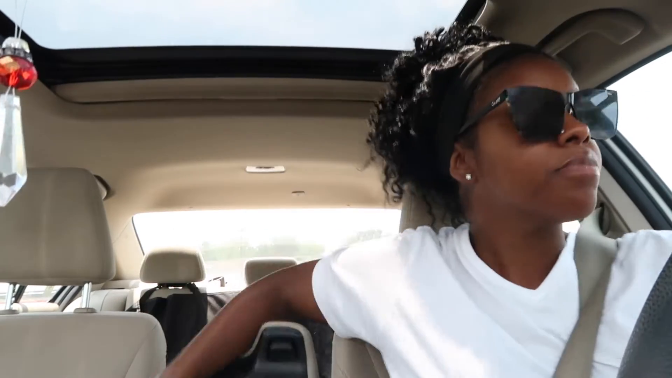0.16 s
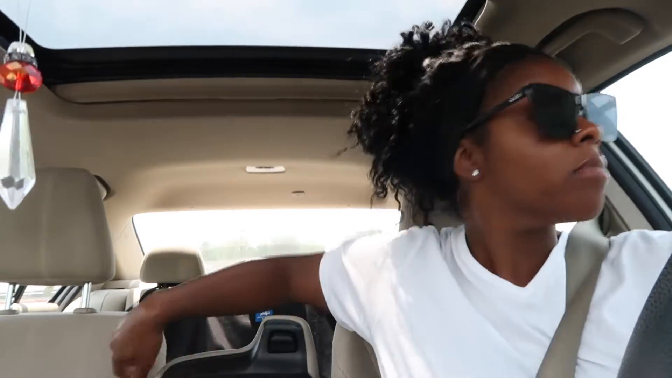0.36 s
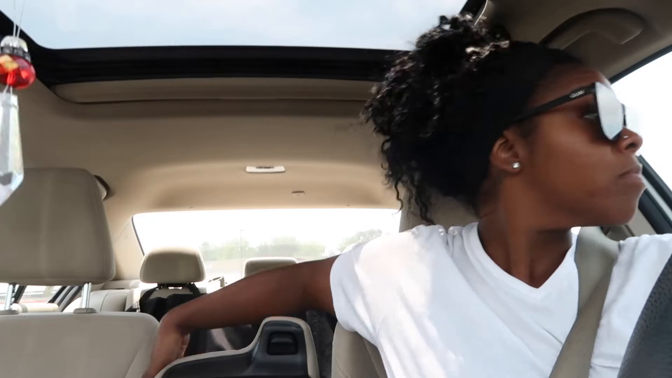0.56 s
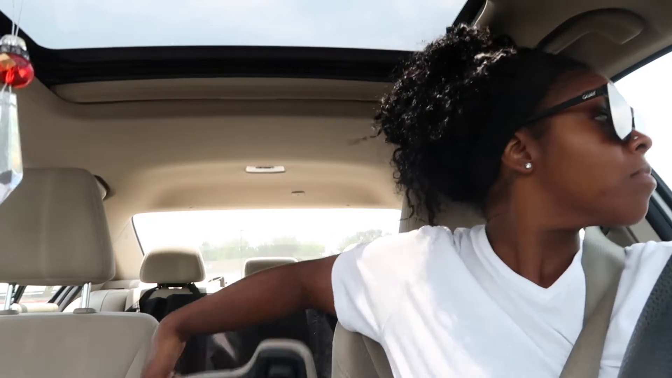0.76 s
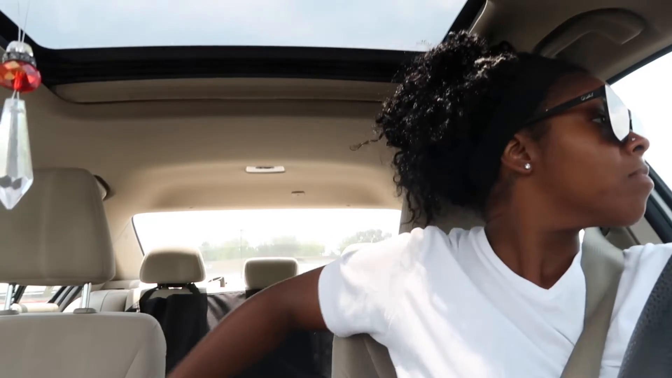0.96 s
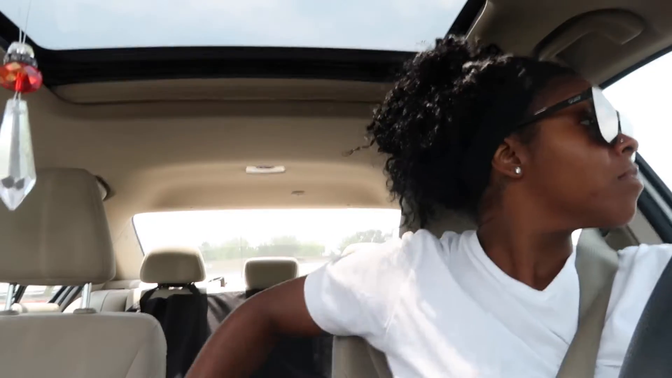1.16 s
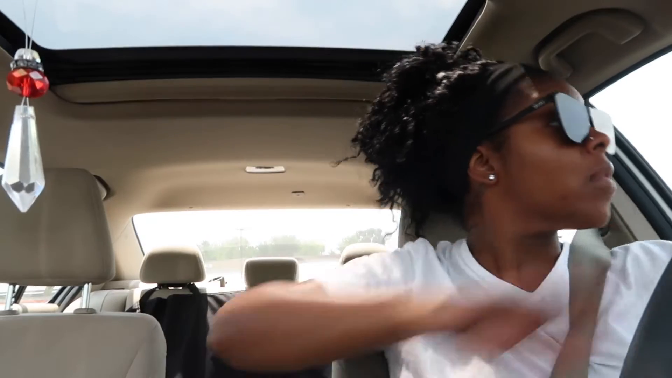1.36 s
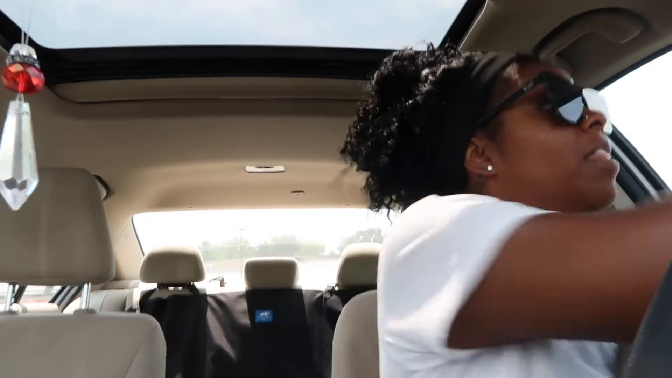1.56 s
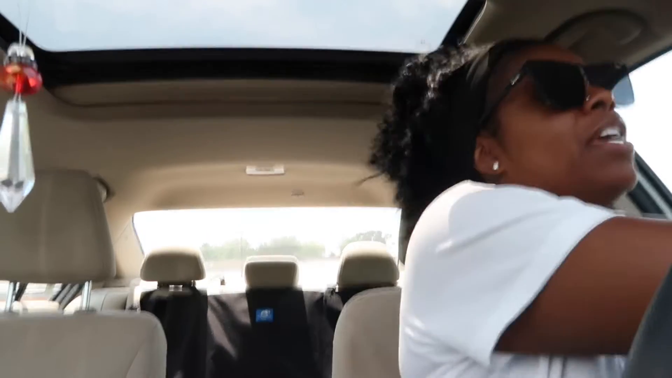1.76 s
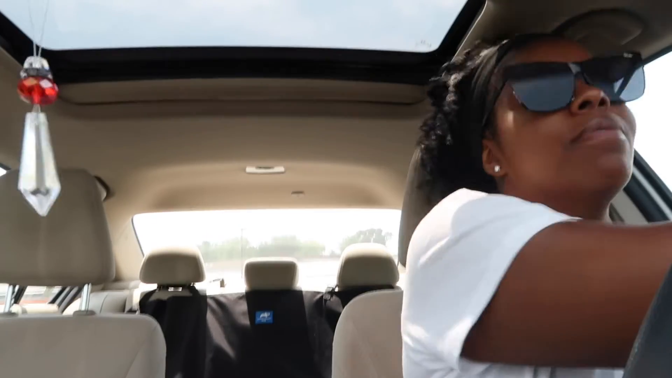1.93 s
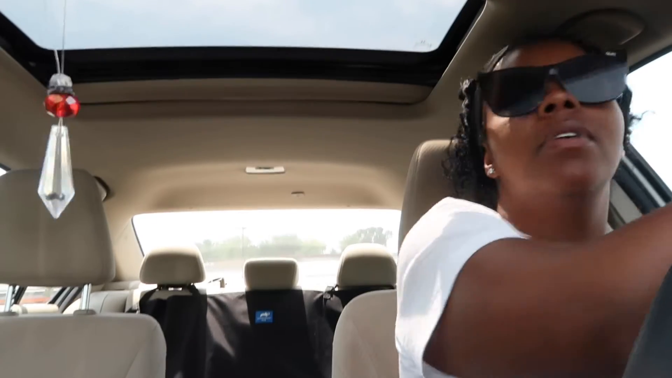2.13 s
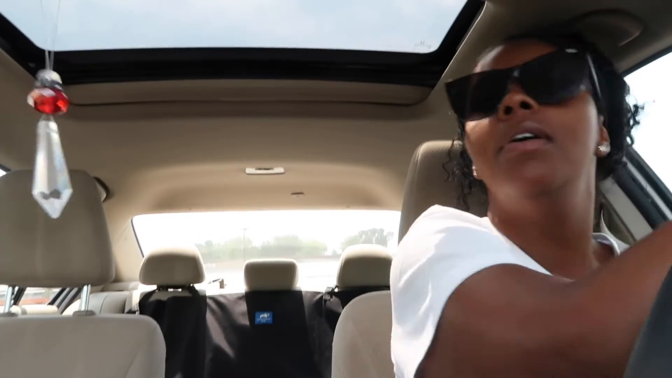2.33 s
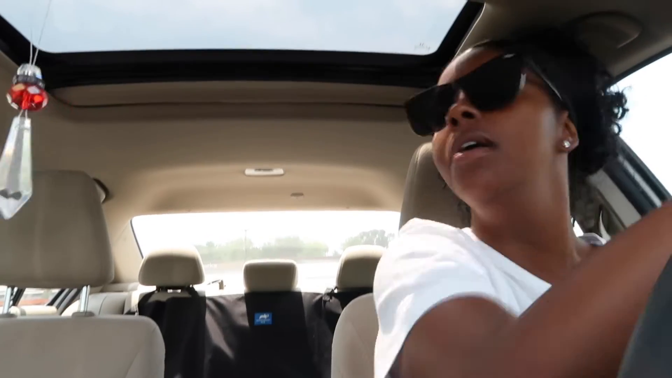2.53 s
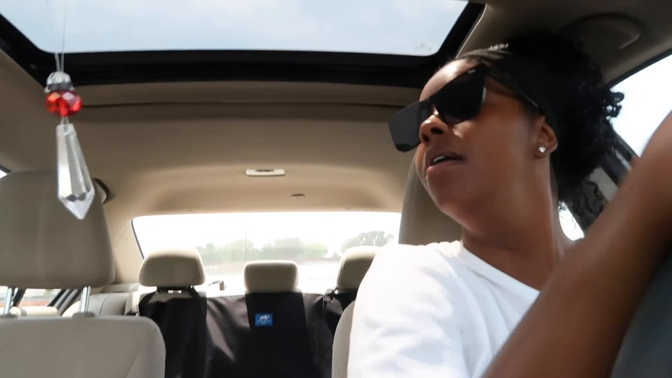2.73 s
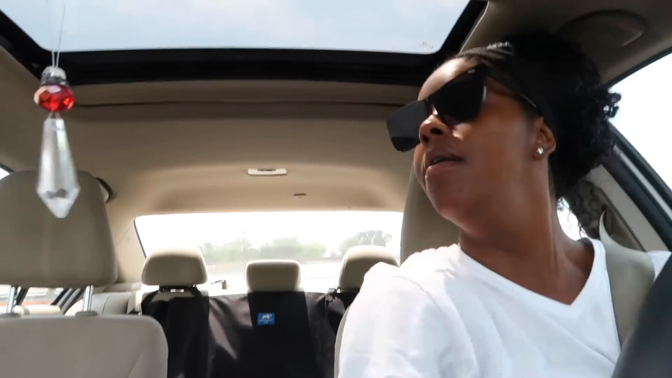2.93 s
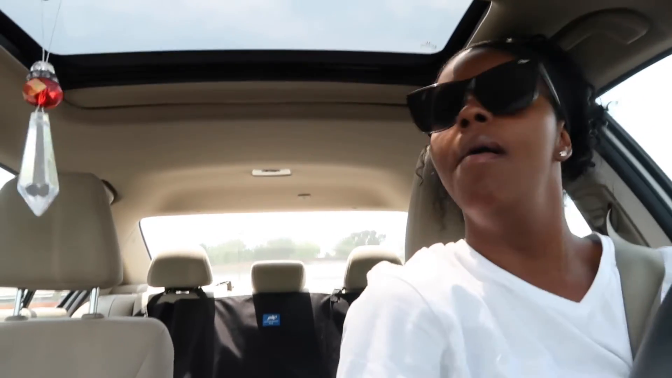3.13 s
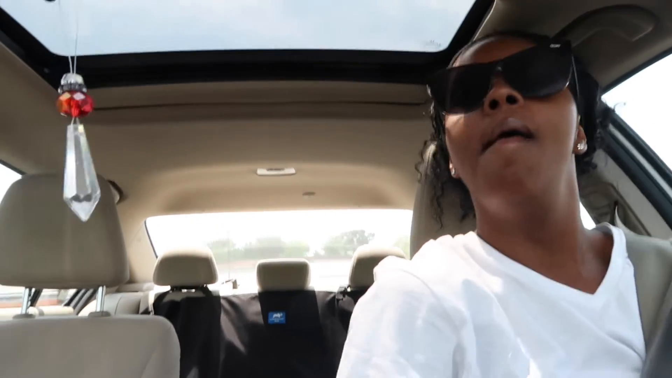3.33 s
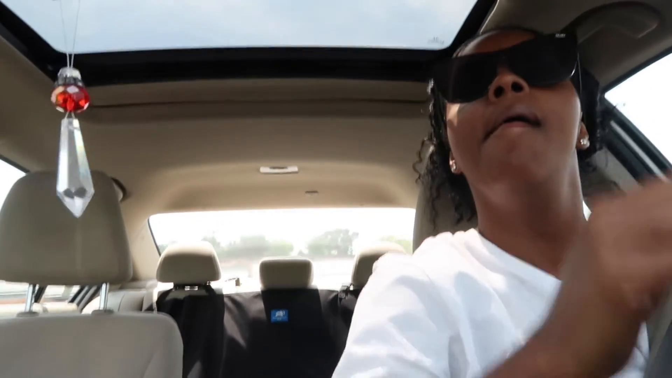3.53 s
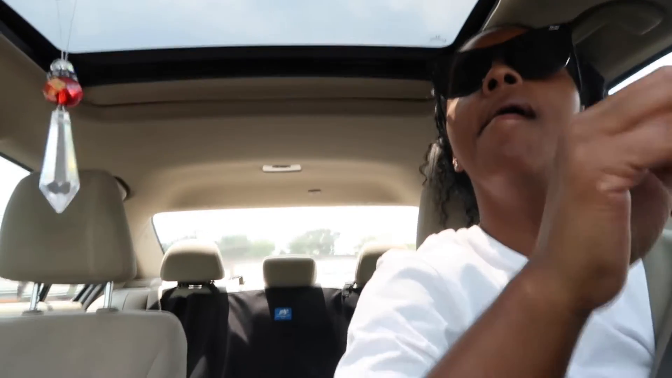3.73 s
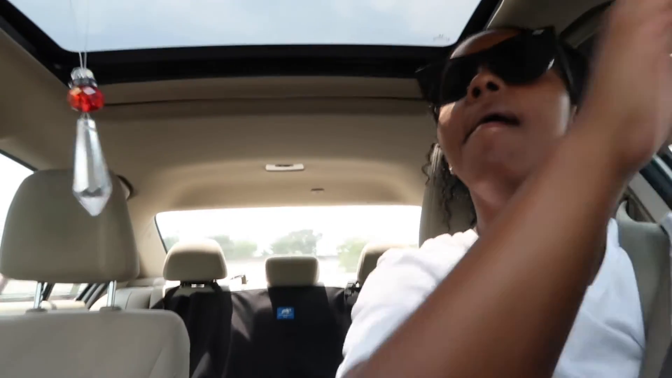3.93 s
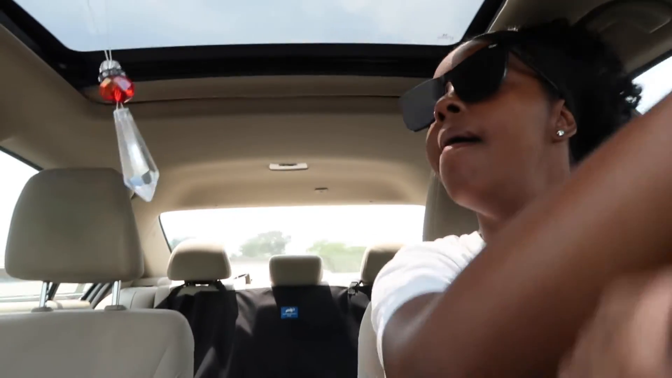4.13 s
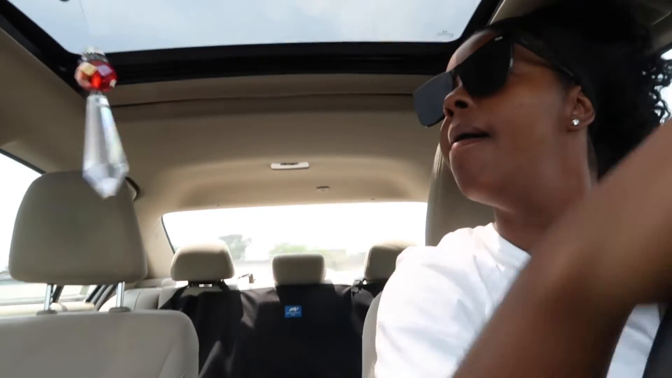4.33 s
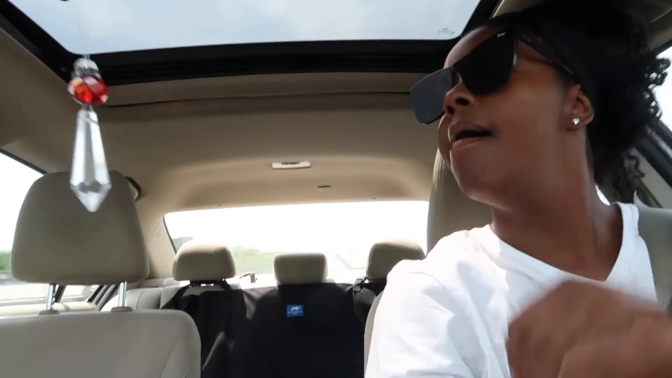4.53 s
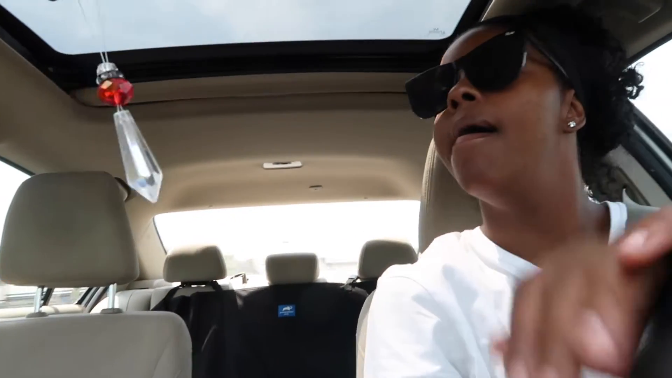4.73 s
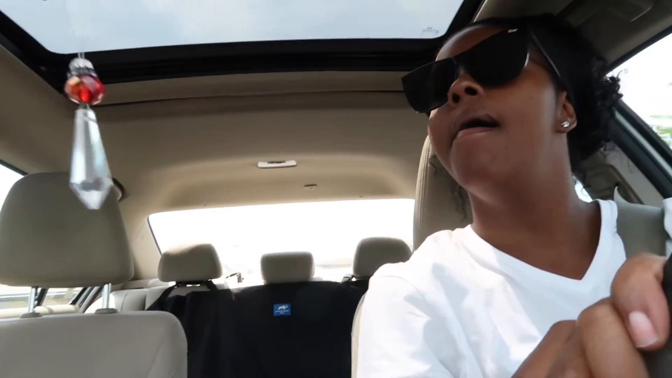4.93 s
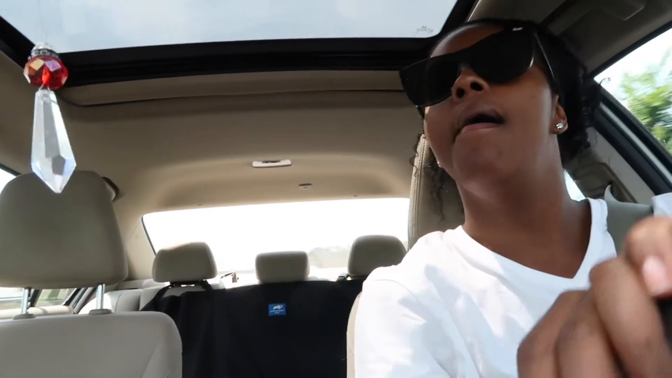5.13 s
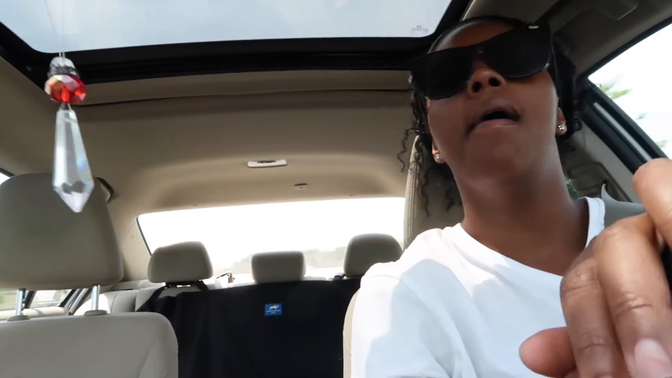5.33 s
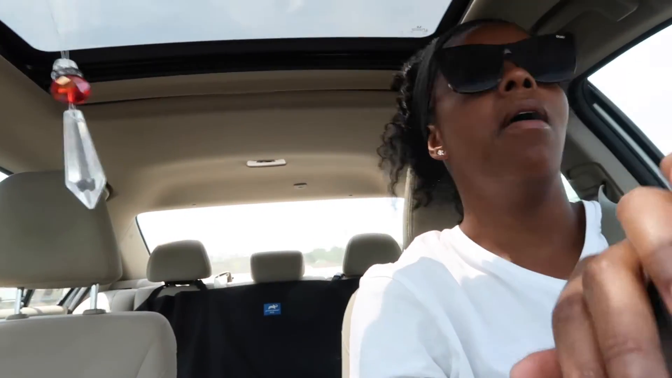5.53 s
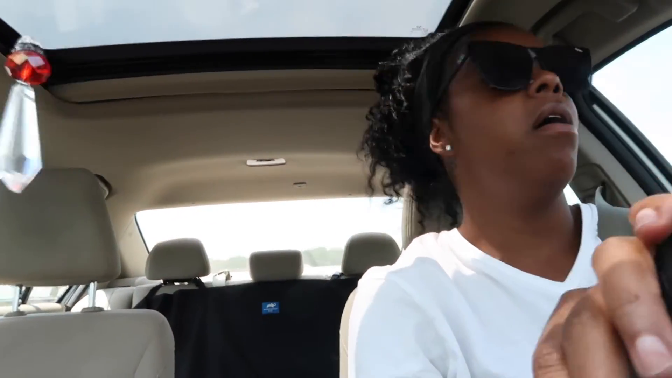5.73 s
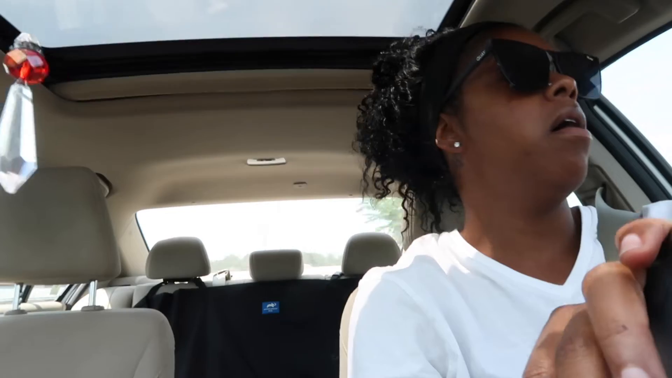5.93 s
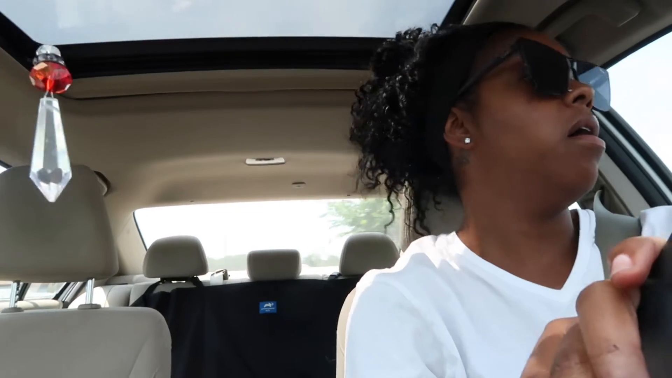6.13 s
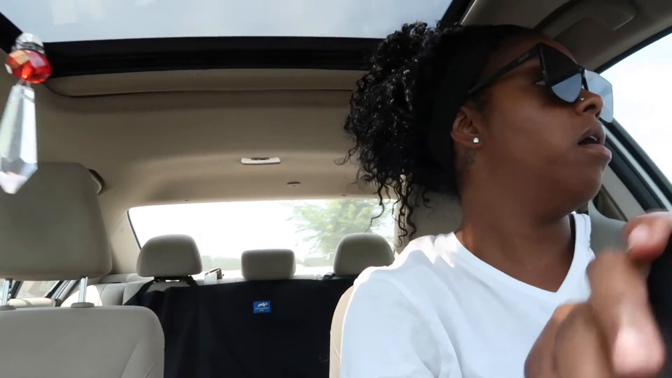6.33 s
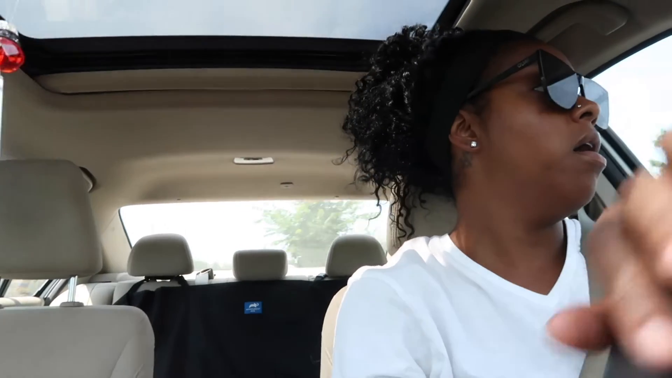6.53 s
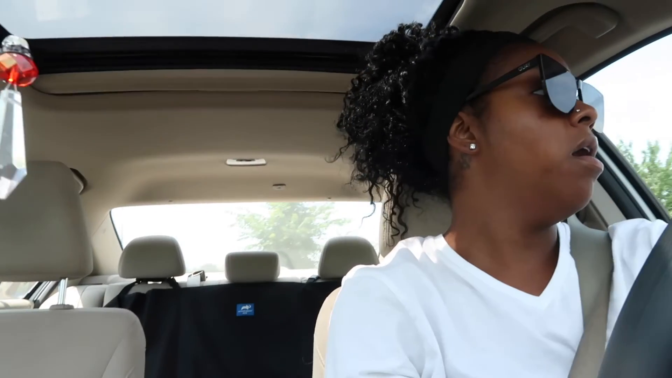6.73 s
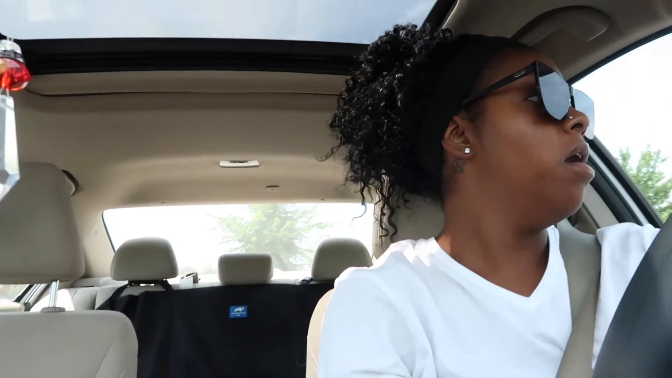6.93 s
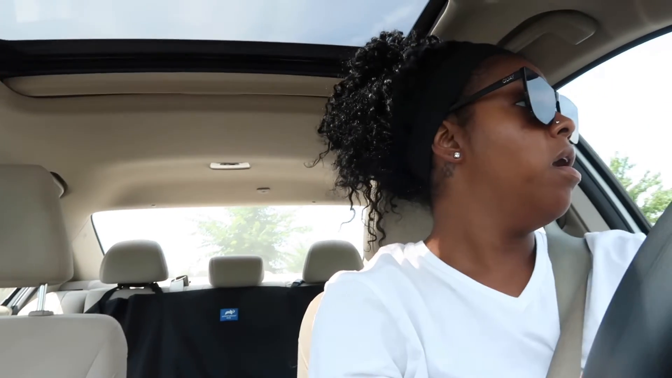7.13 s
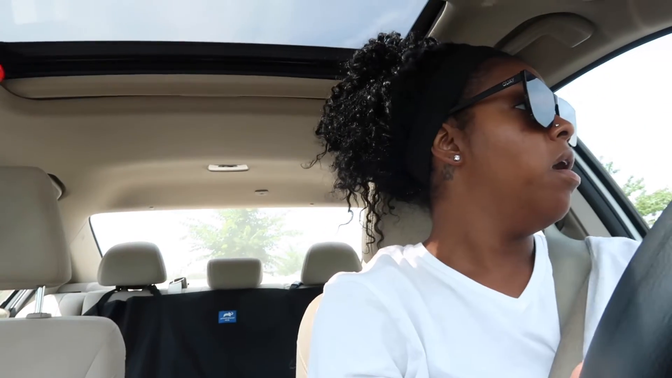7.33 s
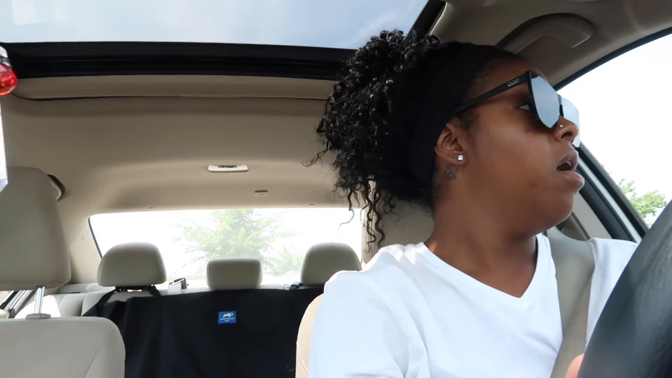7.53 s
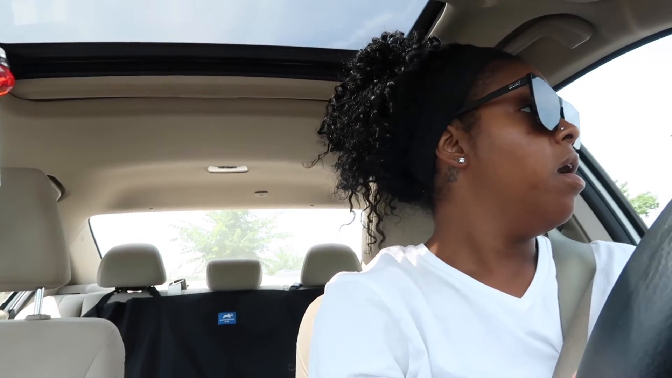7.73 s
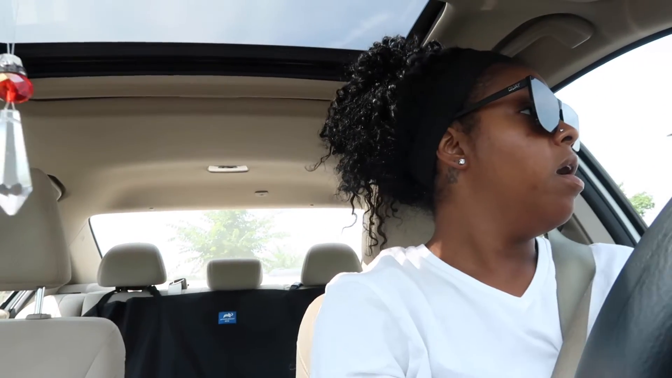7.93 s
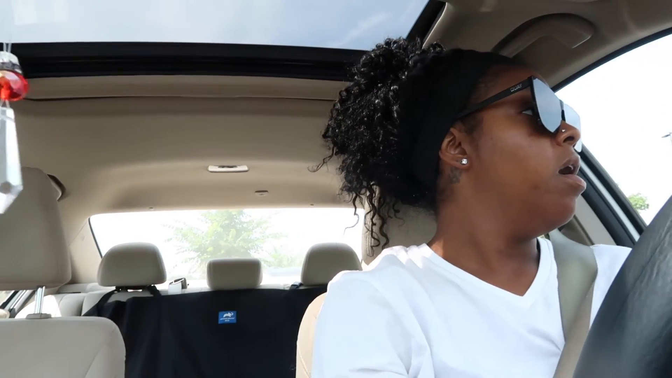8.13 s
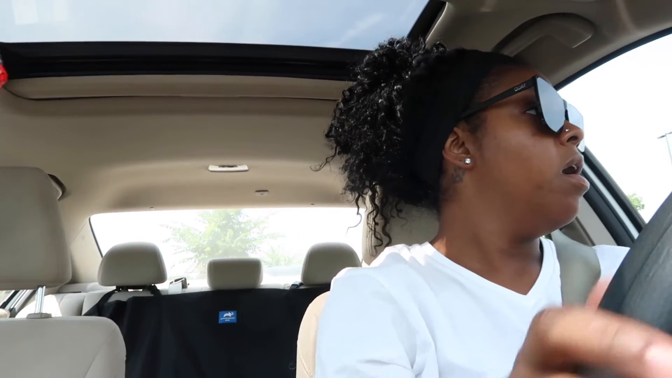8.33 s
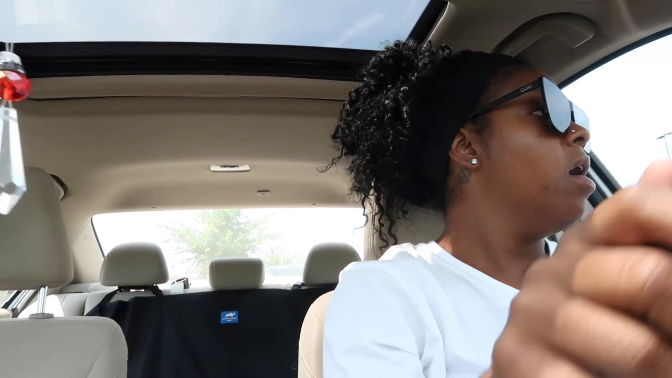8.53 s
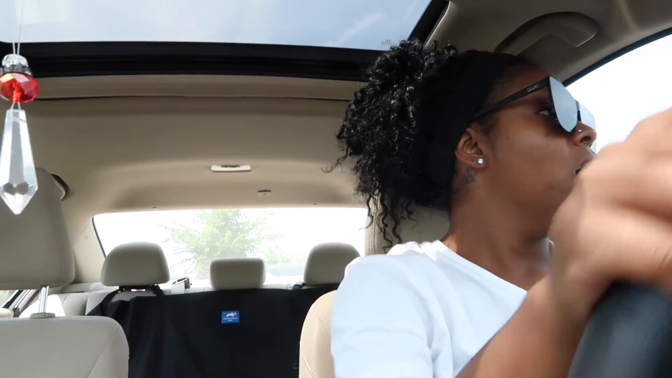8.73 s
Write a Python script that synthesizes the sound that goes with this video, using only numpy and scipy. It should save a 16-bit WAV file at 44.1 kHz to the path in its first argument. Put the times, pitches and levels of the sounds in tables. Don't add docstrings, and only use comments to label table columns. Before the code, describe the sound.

Close inside a small, dry car cabin, a low engine idle and fan hiss sit under a steady indicator tick. Small plastic rattles lead to one loud lid slam, after which the background dips and slowly returns. The engine rises, trim knocks and hands rub the wheel through a turn. A cluster of thumps ends the ticking, and the car slows to a soft idle.

```python
import sys
import numpy as np
from scipy import signal
from scipy.fft import rfft, irfft, next_fast_len
from scipy.io import wavfile

SR = 44100
rng = np.random.default_rng(int(sys.argv[2]) if len(sys.argv) > 2 else 0)


def store_wav(level_fs):
    pcm = np.round(np.clip(np.atleast_2d(level_fs), -1, 1) * 32767)
    wavfile.write(sys.argv[1], SR, pcm.T.astype(np.int16))


def amplitude_ratio(level_db):
    exponent = np.asarray(level_db, float) / 20
    return 10 ** exponent


N = 386757


def in_time(rows):
    s, *columns = np.transpose(rows)
    return [np.interp(np.arange(N) / SR, s, c) for c in columns]


def at_hz(points, hz):
    table_hz, values = np.transpose(points)
    return np.interp(np.log(hz), np.log(np.maximum(table_hz, 1)), values)


def rms_one(x):
    return x / np.sqrt(np.mean(x ** 2) + 1e-20)


def drift(rate):
    r = np.exp(-80 * np.pi * rate / SR)
    slow = signal.lfilter([1], [1, -2 * r, r * r], rng.standard_normal(N // 40 + 2002))[2000:]
    return np.interp(np.arange(N) / 40, np.arange(len(slow)), rms_one(slow))


def resonance(x, hz, width_hz):
    r = np.exp(-np.pi * width_hz / SR)
    poles = [1, -2 * r * np.cos(2 * np.pi * hz / SR), r * r]
    return signal.lfilter([(1 - r * r) / 2, 0, (r * r - 1) / 2], poles, x)


def glide(hz, level_db, flutter_db, rate):
    level = np.sqrt(2) * amplitude_ratio(level_db + flutter_db * drift(rate))
    return level * np.sin(2 * np.pi * np.cumsum(hz) / SR)


def add(out, x, s):
    i = round(s * SR)
    out[..., i:i + x.shape[-1]] += x[..., :N - i]


# frequency in Hz, phase in radians.
PORT_PHASE = [(0, 0), (2500, .45), (6000, 1.25), (7500, 1.9), (8400, 2.3), (9000, 2.85), (9700, 2.35),
              (10400, 2.1), (12000, 2.4), (14000, 2.3), (22050, 2.5)]


def ports(x):
    size = next_fast_len(N, True)
    hz = np.arange(size // 2 + 1) * SR / size
    turn = np.exp(-.5j * np.interp(hz, *np.transpose(PORT_PHASE)))
    return irfft(rfft(x, size) * [turn, 1 / turn], size)[:, :N]


# frequency in Hz, left-right likeness from -1 to 1.
LIKENESS = [(60, .9998), (130, .998), (290, .93), (640, .9), (1410, .4), (3100, .35), (6800, .05),
            (10000, -.4), (11300, -.8), (12300, -.95), (15000, -.997)]


def banded_noise(spectrum, patchy_db):
    out, together, white = 0, drift(4.0), rng.standard_normal((2, 2, N + 8000))
    lowest, highest = spectrum[0][0], spectrum[-1][0]
    count = round(2.5 * np.log2(highest / lowest))
    edges = np.geomspace(lowest, highest, count + 1)
    for k, (low, high) in enumerate(zip(edges, edges[1:])):
        band = signal.butter(2, [low, high], "band", fs=SR, output="sos")
        mid, side = signal.sosfilt(band, white[k % 2])[:, 8000:]
        hz = np.sqrt(low * high)
        alike = np.clip(at_hz(LIKENESS, hz), -.998, 1)
        gain = amplitude_ratio(at_hz(spectrum, hz) + patchy_db * (1.4 * together + drift(8.0)))
        out = out + gain * (np.sqrt(1 + alike) * mid + np.sqrt(1 - alike) * side * [[1], [-1]])
    return out / np.sqrt(np.mean(out.mean(0) ** 2))


DUCK_S, DUCK_DB, DUCK_ATTACK_S, DUCK_HOLD_S, RECOVER_DB_PER_S = 1.17, 17, 0.12, 0.043, 8.5


def gain_control():
    corners = DUCK_S + np.cumsum([0, DUCK_ATTACK_S, DUCK_HOLD_S, DUCK_DB / RECOVER_DB_PER_S])
    return np.interp(np.arange(N) / SR, corners, [0, -DUCK_DB, -DUCK_DB, 0])


# time in seconds, firing rate in Hz, engine load in dB, road shake in dB.
DRIVE = [(0.0, 24.45, -2, -28.5), (1.0, 23.88, 6.5, -37), (1.51, 24.13, 7.5, -23.5),
         (2.1, 45.28, 12, -33.5), (2.3, 42.11, 8.5, -20), (2.65, 36.38, 12, -30.5),
         (3.05, 32.57, 13, -30.5), (3.3, 32.44, 11, -24.5), (3.85, 35.19, 8.5, -24),
         (4.27, 37.34, 14.5, -21.5), (4.64, 43.66, 12, -21.5), (5.2, 37.87, 12.5, -13.5),
         (5.49, 37.47, -1, -21), (5.74, 34.72, 16.5, -34), (6.01, 31.1, 2.5, -19.5),
         (6.5, 25.49, 11.5, -29.5), (7.2, 23.88, -1.5, -24), (8.77, 25.45, 2, -40.5)]


def drive():
    return in_time(DRIVE)


# time in seconds, level in dB.
FAN = [
    (0, 2.5),
    (2.5, 3.5),
    (6.5, 0),
    (8.77, -2),
]


def fan():
    return in_time(FAN)[0]


# time in seconds, level in dB.
RUSH = [(5.15, -68.5), (5.25, -57), (6.25, -57), (6.45, -66), (6.98, -57.5), (8.2, -71.5), (8.77, -70)]


def rush():
    return in_time(RUSH)[0]


# centre in seconds, length in seconds, cloth level in dB.
SHIFTS = [
    (0.38, 3.8, -87.5),
    (2.237, 0.5, -70.5),
    (3.007, 1, -63),
    (4.185, 0.96, -58),
    (5.766, 0.41, -61),
]


def shifting():
    out = np.zeros(N)
    for s, length, db in SHIFTS:
        out += amplitude_ratio(db) * np.clip(1 - 2 * np.abs(np.arange(N) / SR - s) / length, 0, 1) ** 2.3
    return out


# frequency in Hz, level in dB per Hz.
HISS = [(470, -8), (800, -7), (1080, -15.5), (1330, -7), (2560, -13), (3160, -20), (4000, -12), (5200, -29),
        (8800, -120)]
RUSTLE = [(1290, -28.5), (2200, -0.5), (3180, -7), (3870, -5.5), (4330, -7), (6360, -5), (8000, -9.5),
          (10600, -8.5), (13300, -14), (13700, -42.5), (15300, -60)]
VENT_DB, CLOTH_DB, PREAMP_DB, SEAT_RE_CLOTH_DB = -58, -71.5, -70.5, 10.5
SUM_CUT_HZ = 12900


def moving_air(rush_db):
    cloth = shifting()
    preamp = amplitude_ratio(PREAMP_DB - gain_control())
    hiss = amplitude_ratio(VENT_DB) + amplitude_ratio(SEAT_RE_CLOTH_DB) * cloth + preamp
    rustle = amplitude_ratio(CLOTH_DB) + cloth + amplitude_ratio(rush_db)
    air = hiss * banded_noise(HISS, patchy_db=-1.0) + rustle * banded_noise(RUSTLE, patchy_db=1.5)
    alike = air.mean(0)
    low_pass = signal.butter(12, SUM_CUT_HZ, fs=SR, output="sos")
    return air - alike + signal.sosfiltfilt(low_pass, alike)


# frequency in Hz, width in Hz, level in dB re the rush.
SEAL_WHISTLES = [(4870, 250, -9.5), (6470, 800, -5), (3800, 280, -13)]


def seals(rush_db):
    white = rng.standard_normal((len(SEAL_WHISTLES), N))
    bands = np.zeros(N)
    for x, (hz, width, db) in zip(white, SEAL_WHISTLES):
        breath = resonance(resonance(x, hz, width), hz, width)
        bands += amplitude_ratio(db + 2.0 * drift(3.0)) * rms_one(breath)
    return amplitude_ratio(rush_db) * bands


# frequency in Hz, level in dB per Hz.
BOOM = [(12, -39), (20, -15), (43, 5), (80, 9.5), (95, 3), (124, -14), (160, -29), (210, -43.5),
        (350, -120)]
DRONE = [(65, -41), (110, -1.5), (152, -13), (215, -12), (300, -17.5), (346, -10), (384, -19.5), (518, -20),
         (1300, -41), (1690, -83.5), (2860, -120)]
DRONE_DB, DRONE_PER_ROAD, DRONE_DB_PER_OCTAVE, DRONE_PER_FAN = -36, 0.019, 3, 0.67


def ride(hz, road_db, fan_db):
    drone_db = DRONE_DB + DRONE_PER_ROAD * (road_db + 35.5) + DRONE_DB_PER_OCTAVE * np.log2(hz / 25)
    boom = amplitude_ratio(road_db) * banded_noise(BOOM, patchy_db=3.0)
    return boom + amplitude_ratio(drone_db + DRONE_PER_FAN * fan_db) * banded_noise(DRONE, patchy_db=.9)


# tone in Hz, level in dB, share of the fan's easing, fading in dB per s.
BLOWER = [(177.5, -42.5, 2.4, .3), (247.6, -55, 3.6, 0), (350, -49.5, 3.1, 3), (13040, -86, .8, 0)]


def blower(fan_db):
    out, t = np.zeros(N), np.arange(N) / SR
    for hz, db, share, fading in BLOWER:
        level = amplitude_ratio(db + share * fan_db - fading * t + 2 * drift(2.1))
        out += level * np.sin(2 * np.pi * hz * t + 0.98 * drift(2.4))
    return out


# time in seconds, pitch in Hz, level in dB.
PUMP = [(2.45, 242.7, -70.5), (2.6, 222.7, -43.5), (2.9, 204.3, -40), (3.2, 200, -46), (3.5, 204, -46),
        (3.9, 228.4, -48), (4.2, 225, -42), (4.4, 227.8, -57), (4.6, 223, -100)]


def pump():
    return glide(*in_time(PUMP), flutter_db=2.0, rate=1.8)


# level in dB at idle, share of the load that it follows.
FIRING = [(-35, 0.72), (-40, 1.32), (-41.5, 1.01), (-44, 0.71), (-34, -.25)]
# frequency in Hz, gain in dB.
MOUNTS = [(22, -0.5), (33, -4.5), (42, 1), (70, -2.5), (100, 3), (113, -7), (132, -4.5), (165, -10.5),
          (230, -22)]
# time in seconds, phase in radians.
COARSE_ROAD = [(3.9, 0), (4.5, 1.2), (6.2, 1.2), (6.6, .5)]


def engine(hz, load_db, road_db):
    out, turn = np.zeros(N), 2 * np.pi * np.cumsum(hz) / SR
    shake = .25 + .3 * np.maximum(road_db + 27, 0) + in_time(COARSE_ROAD)[0]
    for k, (db, share) in enumerate(FIRING, 1):
        level_db = db + share * load_db + at_hz(MOUNTS, k * hz) + 2.8 * drift(1.3)
        out += np.sqrt(2) * amplitude_ratio(level_db) * np.sin(k * turn + k * k + shake * drift(2.67))
    return out


# time in seconds, pitch in Hz, level in dB.
SQUEAK = [(1.7, 1950, -120), (1.74, 2150, -60), (1.79, 2750, -60), (1.83, 2850, -120)]


def squeak():
    return glide(*in_time(SQUEAK), flutter_db=5.0, rate=60.0)


# start in seconds, length in seconds, level in dB, slips per second.
SLIPS = [(0, 0.14, -56, 970), (0.175, 0.061, -33.5, 360), (0.595, 0.17, -44.5, 670),
         (2.095, 0.088, -39.5, 270), (2.205, 0.11, -40, 430), (2.405, 0.1, -40, 380),
         (4.048, 0.14, -44, 680), (4.193, 0.1, -37.5, 1000), (1.118, 0.095, -42.5, 810),
         (5.73, 0.04, -31, 180), (5.767, 0.084, -39.5, 1500), (8.323, 0.044, -49.5, 120),
         (8.405, 0.11, -42.5, 150), (8.724, 0.083, -46.5, 190)]
# frequency in Hz, width in Hz, level in dB.
RIM = [(1400, 200, -8), (2550, 430, -8.5), (3550, 520, -9), (4760, 110, -5.5), (6270, 660, -11),
       (10700, 5400, -20.5)]


def palm():
    force = np.full(N, 1e-18)
    for s, length, level_db, per_s in SLIPS:
        draw = rng.standard_normal((2, 8000))[:, :round(length * SR)]
        phase = np.cumsum(per_s / SR * (1 + 3.0 * draw[0]))
        slip = np.diff(np.floor(phase), prepend=0) > 0
        friction = rms_one(slip * amplitude_ratio(draw[1]) + 0.13 * draw[1])
        add(force, amplitude_ratio(level_db) * np.hanning(len(slip)) ** 0.35 * friction, s)
    modes = [amplitude_ratio(db) * resonance(force, hz, width) * (-1) ** k for k, (hz, width, db) in enumerate(RIM)]
    return 4.3 * sum(modes)


# time in seconds, peak in dB, centre in Hz.
BUMPS = [(0.213, -13, 294), (0.682, -21.5, 343), (1.109, -1.5, 447), (1.113, -4, 262), (1.122, -10.5, 393),
         (1.133, -24.5, 379), (1.317, -10, 246), (3.338, -32, 227.5), (4.771, -9, 266.1),
         (5.7225, -2.5, 527), (5.738, -7.5, 234), (5.756, -21, 233), (5.776, -5.5, 407), (5.793, -14, 415),
         (5.811, -6, 436), (5.828, -10.5, 415), (5.849, -21, 230), (8.758, -11, 523), (8.764, -6, 233)]
# time in seconds, peak in dB, centre in Hz.
LID_BOOMS = [
    (1.108, -11, 75.4),
    (1.111, -25.5, 92),
    (1.118, -29, 150),
]
# time in seconds, peak in dB, centre in Hz.
BOOMS = [(5.724, -11, 106), (5.776, -14, 118.1), (5.735, -5.5, 190), (5.741, -14, 545), (5.8, -27, 810),
         (8.7575, -6, 471), (8.759, -7, 180)]
BUMP_KIND, LID_KIND, BOOM_KIND = (-0.25, 0.11), (1.4, 0.01), (-27, 0.013)


def bumps():
    out, t = np.zeros(N), np.arange(12000) / SR
    groups = (BUMPS, BUMP_KIND), (LID_BOOMS, LID_KIND), (BOOMS, BOOM_KIND)
    for s, peak_db, hz, air_db, t60 in [(*row, *kind) for rows, kind in groups for row in rows]:
        t60 = t60 * (300 / hz) ** 0.15
        push = rng.standard_normal(12000) * amplitude_ratio(-60 * t / max(t60, .02)) * np.minimum(t / 0.0044, 1)
        thud = resonance(resonance(resonance(push, hz, .5 * hz), hz, 0.75 * hz), hz, 0.75 * hz)
        air = resonance(resonance(push, 64, 110), 76, 130)
        hit = thud / np.abs(thud).max() + amplitude_ratio(air_db) * air / np.abs(air).max()
        add(out, amplitude_ratio(peak_db - 7.0) * hit, s - .002)
    return out


# time in seconds, peak in dB, pitch in Hz, t60 in seconds.
SLAMS = [
    (1.121, -8.5, 110, 0.045),
    (5.7329, -6.5, 98, .05),
    (5.7743, -8.5, 109, 0.06),
]
SLAM_PUSH_S = 0.0037


def slams():
    out, t = np.zeros(N), np.arange(8000) / SR
    for s, peak_db, hz, t60 in SLAMS:
        push = np.sin(np.pi * np.minimum(t / SLAM_PUSH_S, 1)) + 1e-18
        swing = resonance(push, hz, 4.6 / max(t60, .02))
        add(out, amplitude_ratio(peak_db) * swing / np.abs(swing).max(), s)
    return out


# time in
# seconds, peak in dB, pitch in Hz, t60 in seconds.
RINGS = [(1.107, -7.5, 1028, 0.024), (1.109, -15, 1223, 0.032), (1.113, -16, 2395, 0.035),
         (1.117, -1.5, 2272, 0.022), (1.112, -8, 3106, .025), (1.17, -48, 1214, 1.2),
         (1.463, -30, 1577, 0.052), (1.461, -21, 2060, 0.022), (1.478, -39, 4920, 0.032),
         (1.846, -38, 2230, 0.025), (1.85, -40.5, 3330, 0.033), (1.856, -29, 4700, 0.013),
         (1.858, -34.5, 2960, 0.035), (1.877, -35, 2510, 0.052), (1.462, -13.5, 6200, 0.033),
         (3.975, -18, 2202, 0.039), (3.976, -19, 2694, .05), (3.975, -26.5, 4650, 0.046),
         (4.146, -18, 2700, 0.032), (4.202, -17, 2180, 0.0091), (4.514, -31, 2690, 0.06),
         (4.515, -24.5, 3250, 0.053), (4.523, -25, 2000, 0.025), (5.724, -27, 4800, 0.055),
         (5.7267, -18, 1750, 0.02), (5.721, -19.5, 1120, 0.046), (5.737, -20, 1059, 0.07),
         (5.736, -10, 1750, 0.018), (5.767, -19, 1570, 0.027), (5.773, -16, 1650, 0.015),
         (5.791, -29, 1400, 0.03), (5.794, -18.5, 595, 0.1), (5.813, -24.5, 1095, 0.031),
         (5.816, -40, 634, 0.092), (5.837, -31.5, 1014, 0.07), (5.85, -29, 595, 0.057),
         (8.756, -33.5, 2510, 0.061), (3.978, -33, 990, 0.029), (3.012, -40.5, 4230, 0.043),
         (5.04, -41.5, 3510, 0.037), (8.42, -52, 3500, .1), (8.44, -48, 4670, 0.091),
         (1.109, -16, 4220, .03)]
DRY_RINGS = [(0.068, -39, 2260, 0.033), (0.188, -37, 3900, .02), (0.208, -30, 3800, .03),
             (0.848, -38, 3500, .02), (1.109, -22, 1750, .03), (1.112, -16, 3050, .025),
             (1.113, -12.5, 6180, 0.023), (2.858, -25, 5800, .02), (3.012, -35, 2970, .025),
             (3.333, -26, 1696, .03), (3.335, -28.5, 650, 0.037), (3.975, -28, 583, .03),
             (4.202, -22.5, 740, 0.028), (4.445, -32, 2360, .02), (5.732, -27, 3400, .03),
             (5.784, -32, 2600, .03)]
RING_CHATTER_S = 0.0034


def rings(rows):
    out, t = np.zeros(N), np.arange(16000) / SR
    for (s, peak_db, hz, t60), draw in zip(rows, rng.standard_normal((len(rows), 16000))):
        t60 = max(t60, .01)
        chatter = draw * (np.exp(-t / RING_CHATTER_S) + .1 * amplitude_ratio(-60 * t / t60))
        ring = resonance(resonance(chatter, hz, 3.3 / t60), hz, .5 * hz)
        add(out, amplitude_ratio(peak_db) * ring / np.abs(ring).max(), s - .001)
    return out


# frequency in Hz, width in Hz, level in dB.
TRIM = [(435, 37, 3.5), (655, 260, 19.5), (1000, 636, 5.5), (1276, 320, 10.5), (1660, 1100, 2),
        (1750, 240, -22), (2090, 140, -8), (2700, 640, 0.5), (3160, 350, -5), (3866, 420, 6),
        (3900, 600, -3.5)]
CREAK_T60_S, HARD_T60_S, CREAK_DB, HARD_DB = 0.063, 0.037, -42.5, -11
SHELL_HZ, SHELL_WIDTH_HZ, SHELL_DB, SHELL_DB_PER_OCTAVE = 638, 690, -5, -15


def knock(peak_db, centre_hz, bright_db, edge_hz):
    t = np.arange(5000) / SR
    t60 = np.interp(peak_db, [CREAK_DB, HARD_DB], [CREAK_T60_S, HARD_T60_S])
    draw, scatter = rng.standard_normal((2, 5000)), rng.standard_normal(len(TRIM))
    contacts = draw[0] * amplitude_ratio(3.5 * draw[1]) * amplitude_ratio(-60 * t / max(t60, .01)) * np.minimum(t / 0.0038, 1)
    body = resonance(contacts, centre_hz, .2 * centre_hz)
    for k, (hz, width, db) in enumerate(TRIM):
        near_db = -10.0 * abs(np.log2(hz / centre_hz)) - 2.0 + 2.5 * scatter[k]
        body = body + amplitude_ratio(db + near_db) * (-1) ** k * resonance(contacts, hz, width)
    body = resonance(body, centre_hz, 4.2 * centre_hz)
    edge = resonance(contacts, edge_hz, 490) + amplitude_ratio(11) * resonance(contacts, 5600, 1900)
    edge = edge + resonance(resonance(contacts, 7300, 4600), 5200, 8500)
    first_touch = contacts * amplitude_ratio(-60 * t / 0.0045)
    crack = resonance(resonance(first_touch, 2200, 3500), 2200, 5100)
    shell = resonance(resonance(contacts, SHELL_HZ, SHELL_WIDTH_HZ), SHELL_HZ, 2 * SHELL_WIDTH_HZ)
    shell_db = SHELL_DB + SHELL_DB_PER_OCTAVE * np.log2(centre_hz / 1500)
    hit = amplitude_ratio(-13.0) * crack / np.abs(crack).max() + body / np.abs(body).max()
    hit = hit + amplitude_ratio(bright_db) * edge / np.abs(edge).max() + amplitude_ratio(shell_db) * shell / np.abs(shell).max()
    return amplitude_ratio(peak_db + 1.5) * hit


# time in seconds, peak in dB, centre
# in Hz, bright part in dB re peak.
CONSOLE = [(0.0034, -23, 2230, -8.5), (0.0362, -22, 1170, -23), (0.067, -32.5, 1300, -25),
           (0.186, -27.5, 1186, -13.5), (0.2089, -18, 1330, -38), (0.2166, -22, 1360, -22.5),
           (0.6152, -33.5, 1460, -12), (0.6676, -25.5, 1920, -19.5), (0.6828, -19, 3810, -23),
           (0.6978, -24.5, 1150, -7.5), (0.8088, -36.5, 1190, -1.5), (0.847, -31.5, 1380, -40.5),
           (0.923, -39, 1210, 5.5), (1.029, -41, 2280, -16), (1.1068, -5.5, 1190, -8),
           (1.114, -7, 1030, -21.5), (1.1164, -5.5, 2280, -29), (1.4612, -9, 3530, -10),
           (1.478, -32, 3550, -19)]
PULL_AWAY = [(1.6166, -31, 1980, -15), (1.656, -41, 916, 1), (1.846, -30, 2610, -6),
             (1.962, -49.5, 1064, -13), (2.101, -38.5, 986, -12.5), (2.1828, -40.5, 1108, 4.5),
             (2.8573, -8.5, 1694, -8), (2.8816, -22.5, 1390, -19), (3.0123, -28.5, 2628, -11),
             (3.061, -38, 1090, -33), (3.206, -29, 1390, -15), (3.3318, -26, 1660, -34)]
TURN = [(3.929, -22, 1750, -36), (3.9579, -26.5, 2280, -9), (3.9746, -10.5, 1680, -4),
        (4.05, -28, 1400, -12), (4.086, -23, 2607, -2.5), (4.11, -18, 1158, -13), (4.148, -19, 2870, -8.5),
        (4.2016, -16.5, 1210, -6), (4.231, -27.5, 1920, -27), (4.2657, -28, 1100, -13.5),
        (4.2977, -25, 1100, -26), (4.4429, -27, 3840, -10), (4.5121, -9, 1667, -6.5),
        (4.516, -31.5, 1750, 0.5), (4.7705, -33.5, 980, -43)]
STRAIGHTEN = [(5.038, -37, 1270, -9), (5.1833, -52, 1080, 5), (5.524, -31, 1440, -14),
              (5.61, -32, 1895, -21), (5.7219, -14, 1460, -24), (5.725, -26.5, 1710, -22),
              (5.7355, -17.5, 1690, -30), (5.7725, -16, 1750, -30), (6.0004, -31, 1450, -9.5),
              (6.323, -33.5, 1870, -22.5), (6.5676, -47.5, 1030, -1), (6.7756, -46, 1567, 7),
              (8.725, -38.5, 2980, -3), (8.7535, -41, 893, -25.5)]
LID_BRIGHT = [(1.1138, -10, 6200, -8)]
EDGES_HZ = (6360, 4950, 5960, 5750, 6250)


def knocks():
    out = np.zeros(N)
    for rows, edge_hz in zip((CONSOLE, PULL_AWAY, TURN, STRAIGHTEN, LID_BRIGHT), EDGES_HZ):
        for s, peak_db, centre_hz, bright_db in rows:
            add(out, knock(peak_db, centre_hz, bright_db, edge_hz), s - .0015)
    return out


BLINK_START_S, BLINK_PERIOD_S, LAMP_S, FIRST_LATE_S, CANCEL_S = .3027, .70022, .3403, .010, 5.8132
RELAY_DB, CANCEL_DB = (-24, -22), -24.5


def ticks():
    rows = []
    for k in range(16):
        s = BLINK_START_S + k // 2 * BLINK_PERIOD_S + k % 2 * LAMP_S + (k == 1) * FIRST_LATE_S
        rows.append((s, RELAY_DB[k % 2]))
    return rows + [(CANCEL_S, CANCEL_DB)]


# frequency in
# Hz, level in dB, t60 in seconds.
RELAY_SECOND = [(1920, 1, 0.043), (3010, 2.5, 0.04), (3660, 3, 0.0089), (4015, -1.5, 0.062), (5640, 0, 0.011),
                (5800, 11, 0.025), (5980, -15.5, 0.014), (6820, -16, 0.11), (12200, -25, 0.017)]
RELAY_FIRST = [(2440, -4.5, 0.0174), (3460, 0.5, .018), (3860, -4, 0.027), (4700, -25, 0.013),
               (5420, -16, .015), (5850, 11, 0.027), (6200, -18, .015), (6570, -39, .02),
               (11270, -17.5, 0.014)]
RELAY_VARIES, RELAY_CASE_DB, RELAY_DAMPING = 0.45, 1, 4.0


def indicator():
    out, t = np.zeros(N), np.arange(3000) / SR
    envelope = np.minimum(t / .0015, 1) * np.where(t < .006, 1, .3 * amplitude_ratio(-60 * t / .07))
    chatter = rng.standard_normal((2, 3000)) * envelope
    for k, (s, peak_db) in enumerate(ticks()):
        rattle = chatter[k % 2] * (1 + RELAY_VARIES * rng.standard_normal(3000))
        click = np.zeros(3000)
        for hz, db, t60 in (RELAY_FIRST, RELAY_SECOND)[k % 2]:
            mode = resonance(resonance(rattle, hz, RELAY_DAMPING / t60), hz, 960)
            click += amplitude_ratio(db) * rms_one(mode)
        case = resonance(resonance(resonance(rattle, 3600, 3500), 3300, 3500), 3600, 5000)
        click += amplitude_ratio(RELAY_CASE_DB) * rms_one(case)
        add(out, amplitude_ratio(peak_db + 1.5) * click / np.abs(click).max(), s - .001)
    return out


CABIN_T60_S, CABIN_DB, SEAT_CUT_HZ = 0.067, -9.5, 22000


def cabin(x):
    size = next_fast_len(N + SR)
    hz = np.arange(size // 2 + 1) * SR / size
    out = np.zeros((2, len(hz)), complex)
    for k, delay in enumerate(rng.uniform(0.0067, .014, 10)):
        loss = amplitude_ratio(-60 * delay / CABIN_T60_S) / (1 + 1j * hz / SEAT_CUT_HZ)
        loop = loss * np.exp(-2j * np.pi * hz * delay)
        out[k % 2] += loop / (1 - loop) * (-1) ** (k // 2)
    below = hz / 1500 / np.sqrt(1 + (hz / 1500) ** 2)
    out = out.mean(0) + below * (out - out.mean(0))
    return irfft(out * rfft(x, size), size)[:, :N]


def scene():
    hz, load_db, road_db = drive()
    rush_db, fan_db = rush(), fan()
    background = ride(hz, road_db, fan_db) + moving_air(rush_db)
    motors = engine(hz, load_db, road_db) * [[1.004], [.996]] + blower(fan_db) + pump()
    bright = indicator() + knocks() + palm() + rings(RINGS)
    dull = bumps() + squeak() + slams()
    hits = ports(bright) + dull
    near = ports(seals(rush_db) + rings(DRY_RINGS))
    return background + motors + hits + amplitude_ratio(CABIN_DB) * cabin(hits.mean(0)) + near


def top_cut(x):
    return signal.sosfilt(signal.butter(12, 15620, fs=SR, output="sos"), x)


TOP_CUT_HZ = 15500


def record(dry):
    rounded = 1.048 * np.tanh(dry * amplitude_ratio(gain_control()) / 1.2)
    low_pass = signal.butter(8, TOP_CUT_HZ, fs=SR, output="sos")
    return top_cut(signal.sosfilt(low_pass, rounded))


dry = scene()
out = record(dry)
store_wav(out)
```